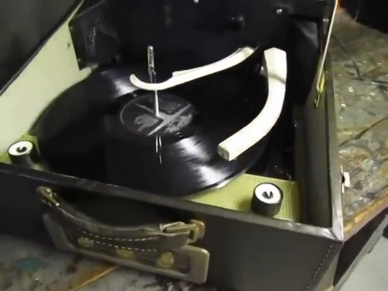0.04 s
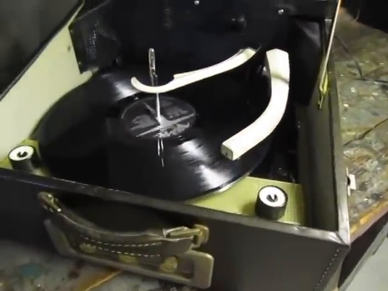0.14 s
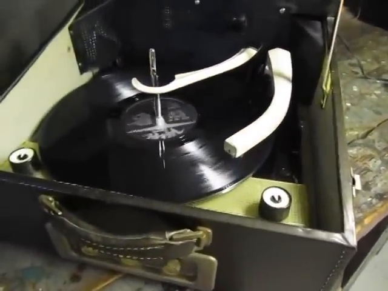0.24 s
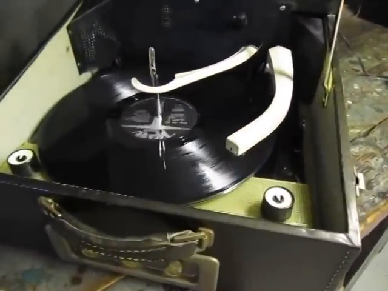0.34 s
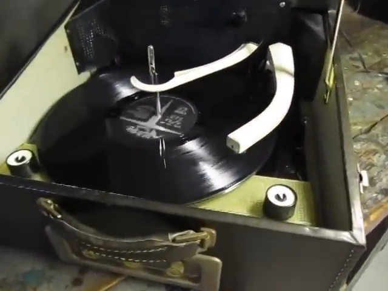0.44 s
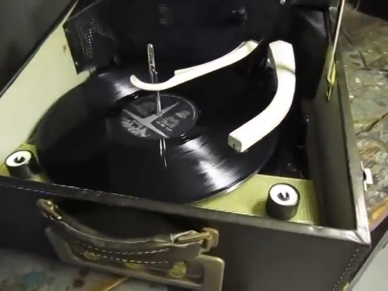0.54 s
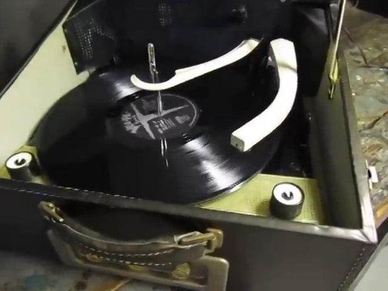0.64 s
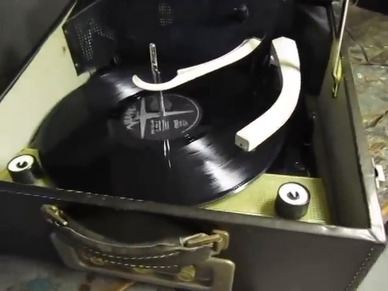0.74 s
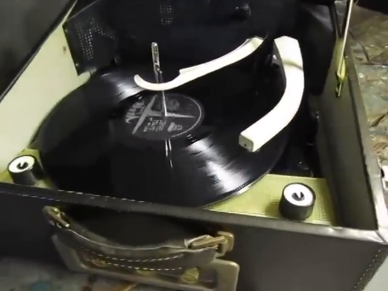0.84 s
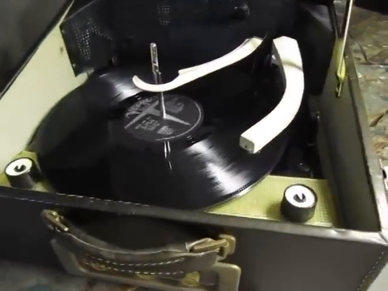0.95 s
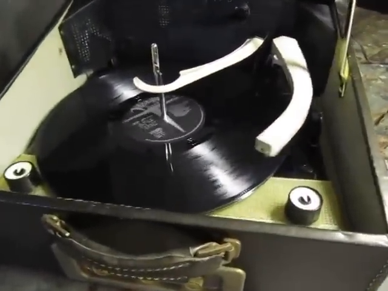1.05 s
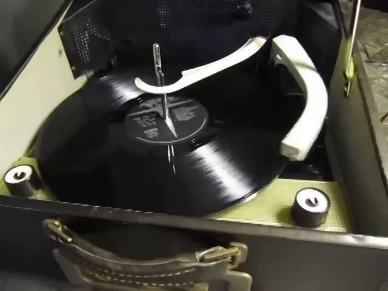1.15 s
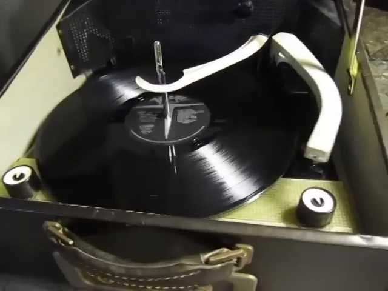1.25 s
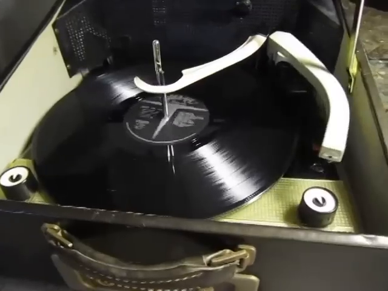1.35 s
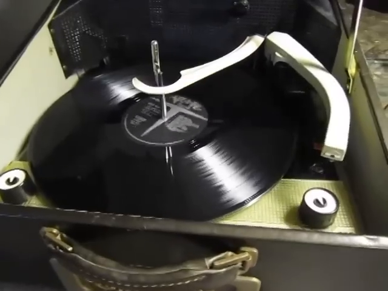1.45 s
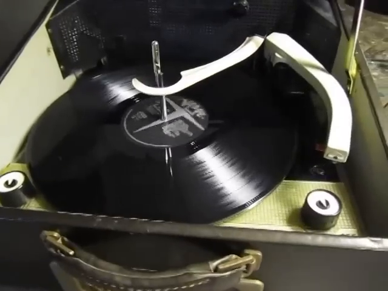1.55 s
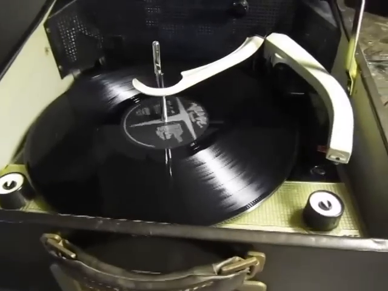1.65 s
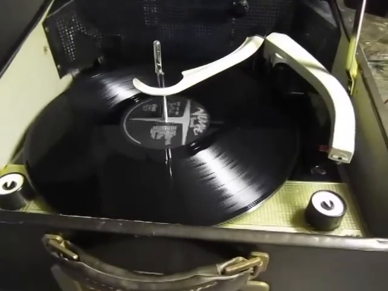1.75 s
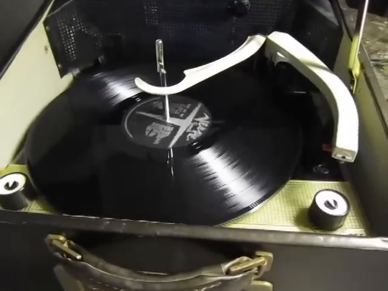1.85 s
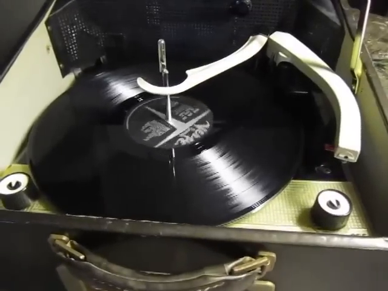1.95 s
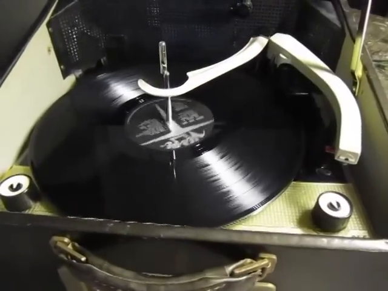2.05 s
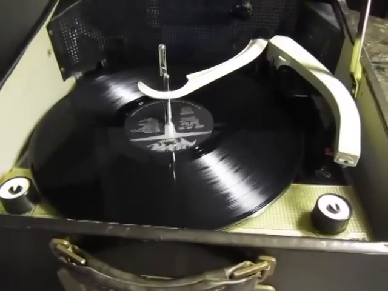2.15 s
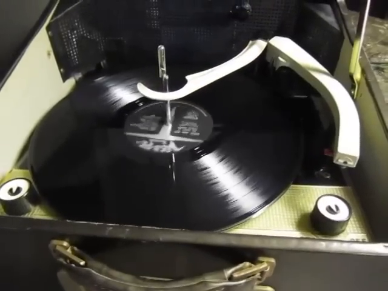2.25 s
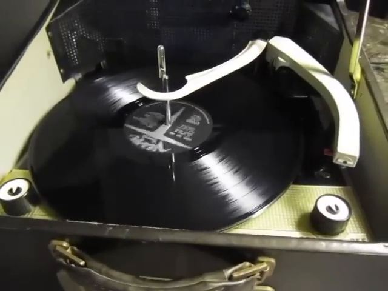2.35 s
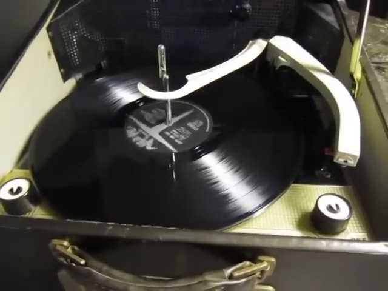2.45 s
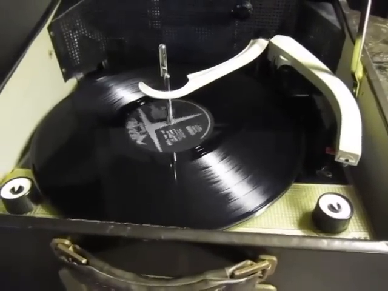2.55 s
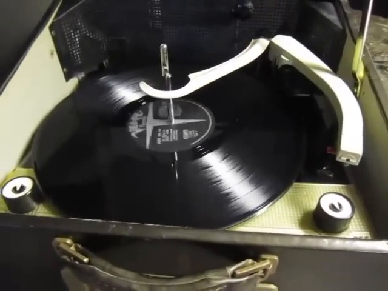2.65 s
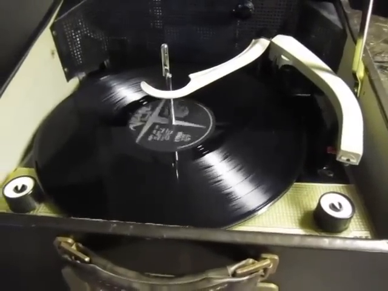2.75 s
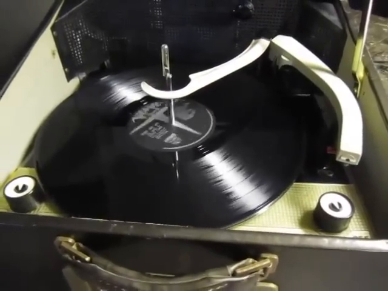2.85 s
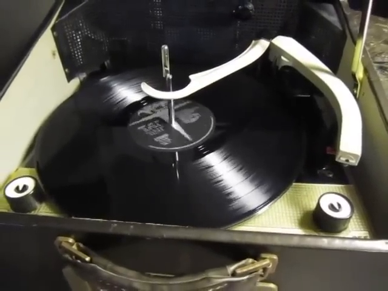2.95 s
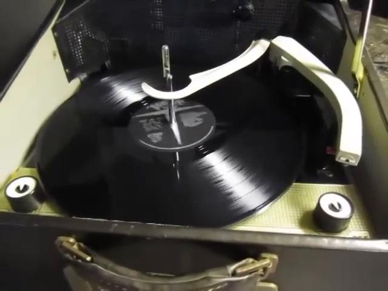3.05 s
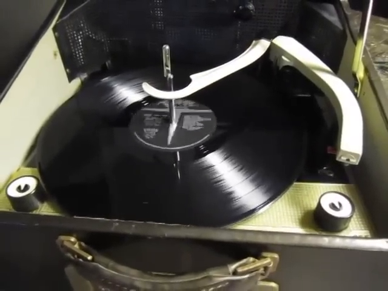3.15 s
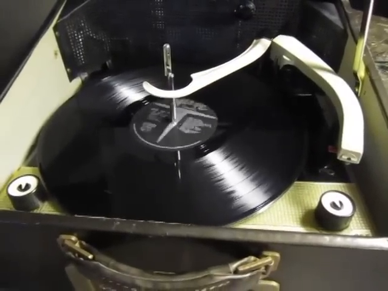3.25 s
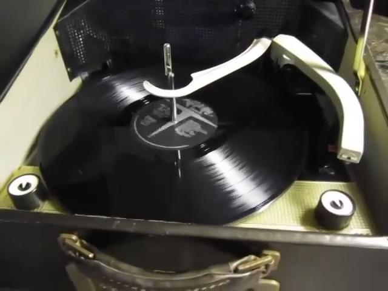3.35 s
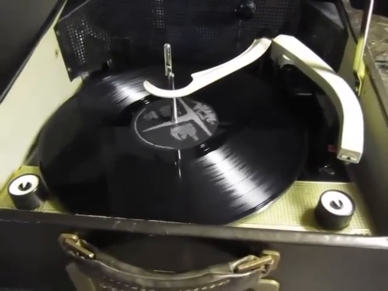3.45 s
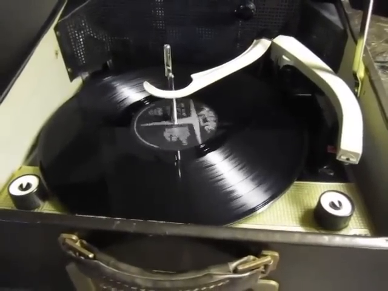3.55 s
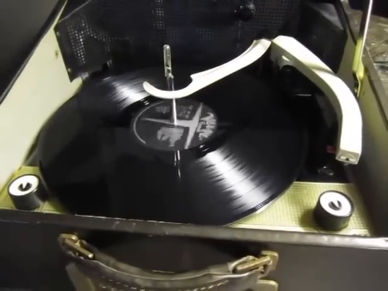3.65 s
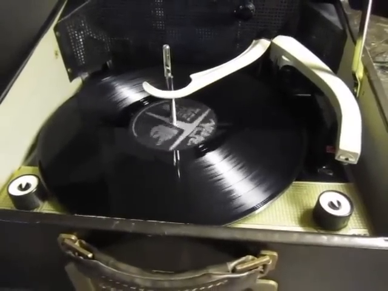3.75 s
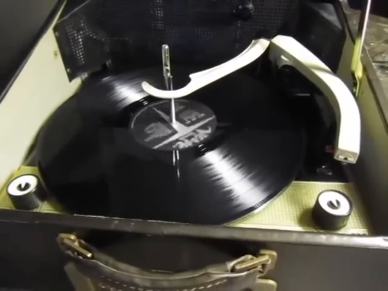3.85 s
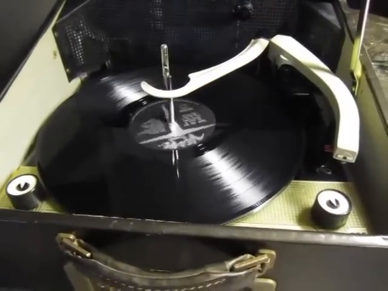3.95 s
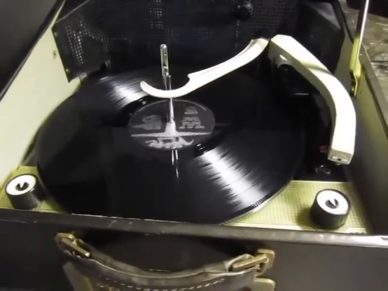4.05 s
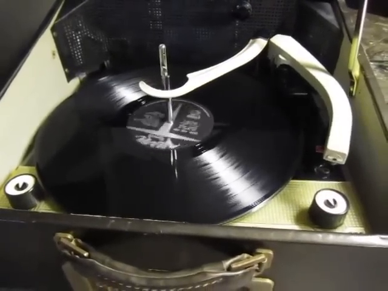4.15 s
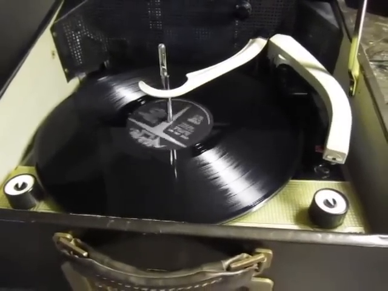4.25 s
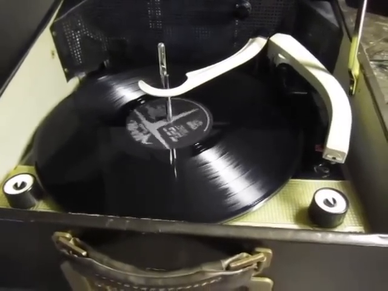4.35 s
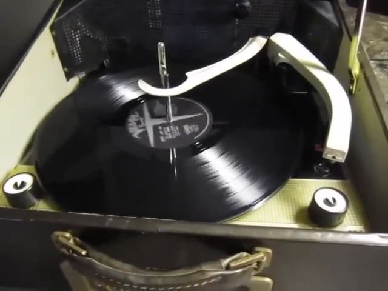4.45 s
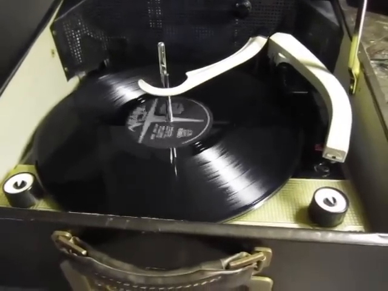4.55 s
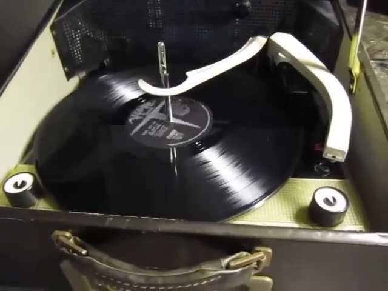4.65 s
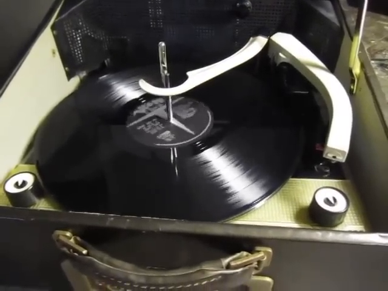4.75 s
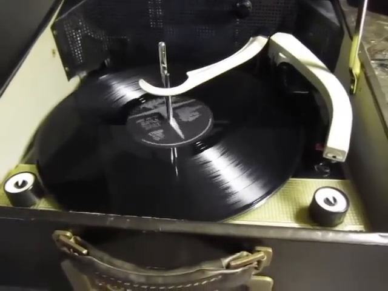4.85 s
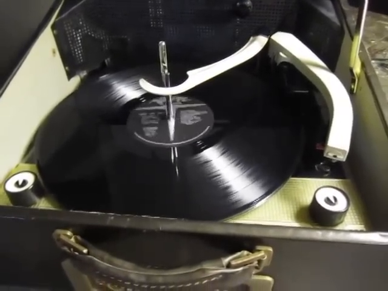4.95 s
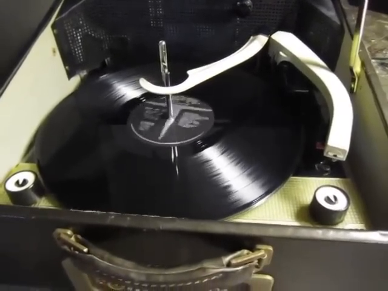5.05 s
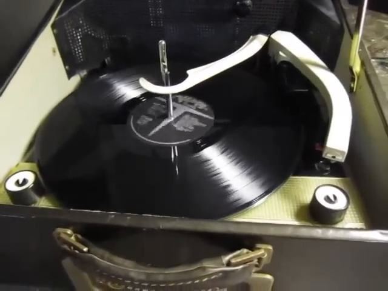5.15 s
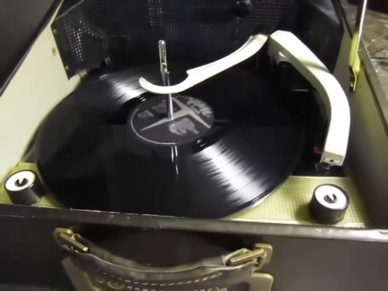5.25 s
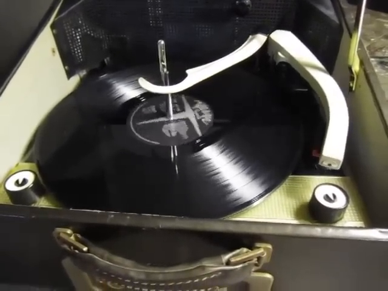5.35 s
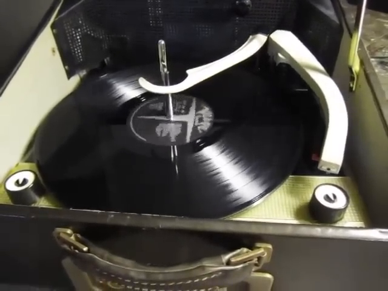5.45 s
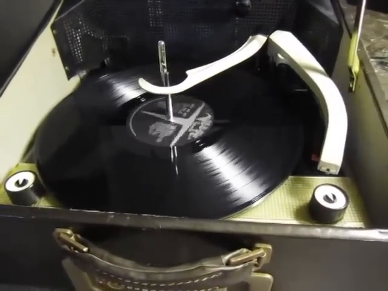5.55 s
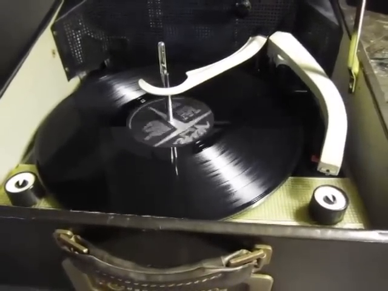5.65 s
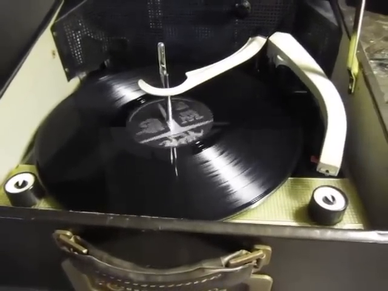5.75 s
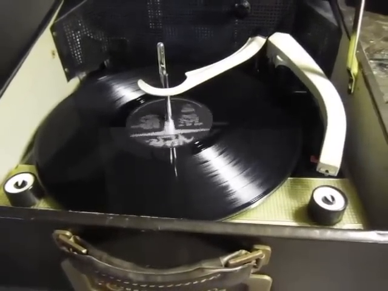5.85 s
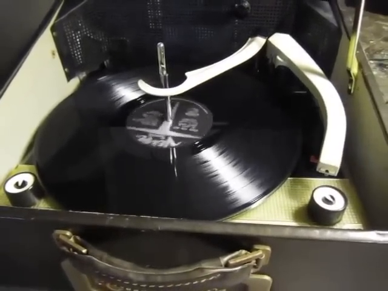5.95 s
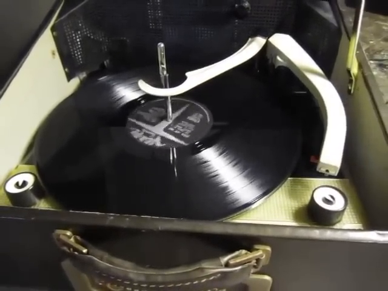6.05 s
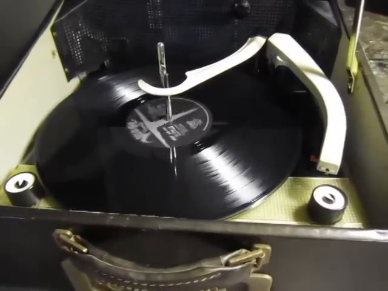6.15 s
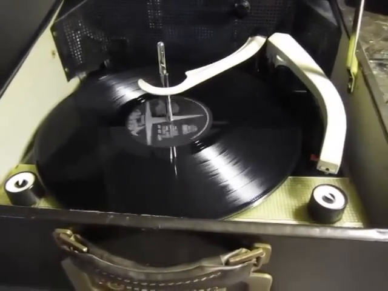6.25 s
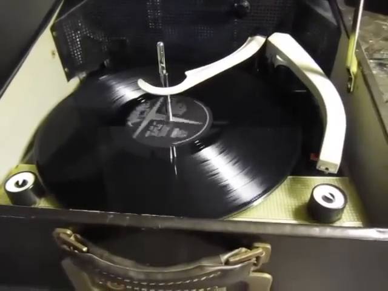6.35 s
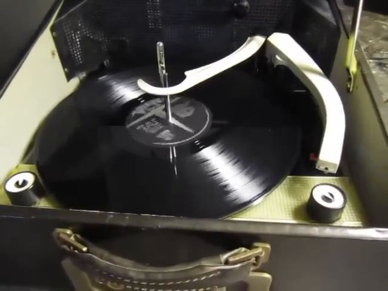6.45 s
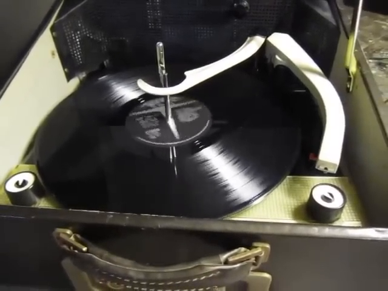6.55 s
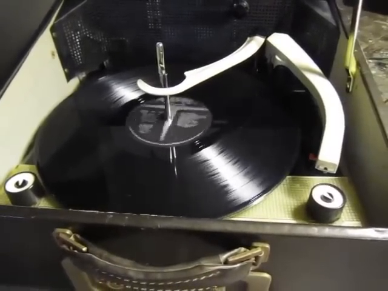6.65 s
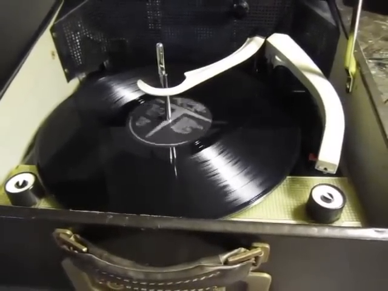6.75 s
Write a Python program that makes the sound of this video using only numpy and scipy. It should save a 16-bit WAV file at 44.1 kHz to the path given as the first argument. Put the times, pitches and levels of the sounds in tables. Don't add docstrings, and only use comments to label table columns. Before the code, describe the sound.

Close indoor stereo pickup of an old automatic turntable: steady electrical hum and mechanical rumble, light knocks and singing spring as the arm returns, then a quieter stretch with isolated ticks. Cams scrape and slam, several clunks follow, and a sharp double-edged switch snap kills the hum. The background ducks suddenly, thin spring tones linger with a faint room echo, and a loose lever clatters to rest as hiss creeps back.

```python
import sys
import numpy as np
from scipy import signal
from scipy.fft import rfft, irfft, next_fast_len
from scipy.io import wavfile
from scipy.ndimage import uniform_filter1d, map_coordinates

SR = 44100
rng = np.random.default_rng(int(sys.argv[2]) if len(sys.argv) > 2 else 0)


def convert_level_to_amplitude(level_db):
    exponent = np.asarray(level_db, float) / 20
    return 10 ** exponent


def to_wav(s):
    ch = np.atleast_2d(s).T
    pcm = np.round(np.clip(ch, -1, 1) * 32767)
    wavfile.write(sys.argv[1], SR, pcm.astype(np.int16))


N = 300214
MAINS_HZ = 59.99
SWITCH_S = 5.986
LEAD, SPAN = 1024, 8192
AGE = (np.arange(SPAN) - LEAD) / SR


def unit(x):
    return x / np.sqrt(np.mean(x ** 2) + 1e-20)


def along(points, hz):
    f, v = np.transpose(points)
    return np.interp(np.log(hz + 1), np.log(f + 1), v)


def wobble(rate):
    coarse = np.arange(0, N + 64, 64)
    knots = rng.standard_normal(int(N * rate / SR) + 4)
    return np.interp(np.arange(N), coarse, map_coordinates(knots, [coarse * rate / SR]))


def coloured(x, response):
    m = next_fast_len(len(x) + 4096)
    return irfft(rfft(x, m) * response(np.fft.rfftfreq(m, 1 / SR)), m)[:len(x)]


def noise(gain, size=N):
    return unit(coloured(rng.standard_normal(size), gain))


def bump(hz, centre_hz, width_hz):
    return 1j * hz * width_hz / (centre_hz ** 2 - hz ** 2 + 1j * hz * width_hz)


def step(at_s, length_s):
    return .5 + .5 * np.tanh((np.arange(N) / SR - at_s) / length_s)


def since(at_s):
    return np.maximum(np.arange(N) / SR - at_s, 0)


def blow(t60, rise):
    hold_s = 0.0018
    swell = np.clip(1 + AGE / rise, 0, 1) ** 2
    after = np.maximum(AGE, 0)
    return swell * convert_level_to_amplitude(-60 * after ** 2 / (after + hold_s) / t60)


def add(track, s, db, sound):
    track[round(s * SR):][:SPAN] += convert_level_to_amplitude(db) * sound / np.abs(sound).max()


def ring(modes):
    t = np.arange(SR // 2) / SR
    loose = lambda: map_coordinates(rng.standard_normal(40), [t * 60])
    total = 0
    for hz, db, t60, uneven_db in modes:
        strength = convert_level_to_amplitude(db + uneven_db * loose() - 60 * t / t60)
        total = total + strength * np.sin(2 * np.pi * hz * t + uneven_db / 6 * loose())
    return np.minimum(t / 0.0062, 1) * np.cos(np.pi * t) * total


# pitch_hz [Hz], level_db [dB per Hz]
WORKS = [(24, -35), (40, -15.5), (98, -10), (174, 0.5), (429, -5), (593, -7.5), (655, -9), (977, -10.5),
         (1320, -14.5), (3320, -18.5), (3950, -27.5), (4480, -23), (7020, -25), (11000, -40),
         (13600, -51.5), (15600, -70.5)]


def works_colour(hz):
    return convert_level_to_amplitude(along(WORKS, hz))


# harmonic [multiple of mains], level_db [dB peak]
HUM = [(1, -65), (2, -65.5), (3, -58.5), (4, -66.5), (5, -65.5), (6, -70.5), (8, -83.5), (9, -64.5),
       (12, -71), (14, -74), (15, -76.5)]
# pitch_hz [Hz], width_hz [Hz], level_db [dB]
WHIRR = [(3212, 110, -77), (4415, 99, -84.5), (5210, 190, -83), (6060, 110, -86), (7150, 61, -86.5)]


def motor():
    turn = 2 * np.pi * MAINS_HZ * np.arange(N) / SR
    hum = 0
    for k, db in HUM:
        phase = .08 * wobble(4) + rng.uniform(0, 2 * np.pi)
        hum = hum + convert_level_to_amplitude(db + 1.0 + 2.1 * wobble(5.3)) * np.sin(k * turn + phase)
    works = convert_level_to_amplitude(-56 + 0.98 * wobble(2.6) + 0.72 * wobble(25)) * noise(works_colour)
    rumble = coloured(works, lambda f: 1 / (1 + (f / 170) ** 4))
    whirr = sum(convert_level_to_amplitude(db) * noise(lambda f: bump(f, hz, width) ** 2) for hz, width, db in WHIRR)
    whine_db = -67.5 - 12.5 * step(.99, .03) + 0.814 * wobble(5.8)
    whine = convert_level_to_amplitude(whine_db) * noise(lambda f: bump(f, 3400, 150.8) ** 2)
    off = step(SWITCH_S + .05, .025)
    return convert_level_to_amplitude(-23.5 * off) * (hum + whirr) + convert_level_to_amplitude(-4.5 * off) * rumble + convert_level_to_amplitude(-3.5 * off) * (works - rumble) + whine


def buzz():
    strain = np.exp(-((np.arange(N) / SR - 1.1) / 0.44) ** 2)
    level_db = -62 + 2 * strain - 12.5 * since(SWITCH_S)
    phase = 2 * np.pi * 10 * MAINS_HZ * np.arange(N) / SR
    return convert_level_to_amplitude(level_db + .8 * wobble(9.7)) * np.sin(phase + .1 * wobble(4))


def room_tone():
    return convert_level_to_amplitude(-59) * noise(lambda f: works_colour(f) * bump(f, 1210, 3000) ** 2 * (f > 130))


# pitch_hz [Hz], level_db [dB per Hz]
HISS = [(15, -51.5), (25, -28.5), (160, -0.5), (247, -4.5), (290, -3), (568, -10.5), (1460, -21.5),
        (2710, -28), (3950, -38), (5030, -35.5), (6590, -36), (10100, -48), (15600, -70.5)]


def microphone_hiss():
    return convert_level_to_amplitude(-47.5) * noise(lambda f: convert_level_to_amplitude(along(HISS, f)))


def camera_gain():
    climb_db = -4.5 + 6 * step(.95, .39)
    return convert_level_to_amplitude(climb_db - 10.5 * step(SWITCH_S + .02, .02) + 5.5 * since(SWITCH_S))


# start_s [s], level_db [peak dB], pitch_hz [Hz], t60_s [s]
THUDS = [(.427, -45.5, 180, 0.06), (1.028, -33, 268.4, 0.19), (1.213, -28.5, 285, 0.14),
         (1.222, -38, 110, 0.11), (1.231, -28, 200, 0.103), (1.249, -28, 229, .076),
         (1.268, -33.5, 223.5, 0.069), (1.311, -40.5, 281, 0.19), (1.725, -45, 400, .06),
         (1.446, -37.5, 268, 0.11), (1.439, -42.5, 151, 0.12), (2.87, -44.5, 188.6, 0.4),
         (3.332, -43.5, 242, .11), (4.097, -37.5, 156, .09), (4.129, -39, 376, 0.062),
         (4.146, -35.5, 225, 0.13), (4.165, -39.5, 133, .084), (4.437, -25.5, 456, 0.025),
         (4.442, -32, 248, 0.085), (5.146, -31, 232, 0.07), (5.335, -43.5, 263, .1),
         (5.984, -26.5, 250.6, 0.14), (5.986, -49, 60, .09), (6.677, -44, 280.5, .22)]


def thuds():
    out = np.zeros(N + SPAN)
    for s, db, hz, t60 in THUDS:
        grit = 0.39 * noise(lambda f: bump(f, hz, 0.81 * hz) ** 2, size=SPAN)
        add(out, s, db, blow(t60, .003) * (np.sin(2 * np.pi * hz * AGE) + grit))
    return out[LEAD:][:N]


# pitch_hz [Hz], level_db [dB]
TREBLE = [(3500, 6), (4000, -4), (5500, -1.5), (9000, -5.5), (12000, -13.5), (13500, -19), (14500, -28),
          (15500, -40)]


def treble(hz):
    return convert_level_to_amplitude(along(TREBLE, hz))


# start_s [s], level_db [peak dB], pitch_hz [Hz], t60_s [s]
PIPS = [
    (0.434, -55, 810, 0.042),
    (1.11, -39.5, 940, 0.023),
    (1.165, -40.5, 732, 0.037),
    (2.105, -49, 969, 0.054),
    (3.846, -33.5, 982, 0.027),
    (4.371, -37, 920, 0.024),
    (5.061, -45, 715, 0.035),
    (5.511, -40.5, 2520, 0.035),
    (5.683, -44, 965, 0.043),
]
# start_s [s], level_db [peak dB],
# pitch_hz [Hz], t60_s [s]
PART_NOTES = [(4.4435, -15.5, 957, 0.022), (4.4472, -16.5, 1010, .018), (5.9848, -10, 2380, 0.025),
              (5.9858, -9.5, 3150, 0.022), (5.986, -23, 750, .05), (5.985, -36, 14500, .03),
              (5.9848, -13, 6070, 0.033), (5.984, -20.5, 960, 0.041), (5.9875, -15.5, 2500, .015),
              (5.9915, -18, 5400, .04), (6.0045, -24.5, 5114, .06), (6.006, -28, 6070, .04),
              (6.029, -33, 7500, .04), (6.5835, -27, 1700, 0.026), (6.582, -30.5, 2900, .03),
              (6.541, -31, 3200, .04), (6.541, -34, 1380, .04), (4.431, -23.5, 6300, .04),
              (4.444, -25, 3000, .03), (4.434, -29, 2600, 0.045), (4.431, -24.5, 7100, .04),
              (4.436, -24.5, 7500, .04), (4.433, -27, 4800, .04),
              (1.219, -38, 9000, .015), (1.224, -34, 5620, .03), (1.265, -38, 1890, .05),
         (1.309, -35, 7500, .04), (1.31, -41, 1900, .06), (1.309, -47, 11470, 0.069), (1.31, -53, 9220, .1),
         (1.632, -45, 2500, .04), (1.657, -46, 2680, .04), (1.726, -35.5, 1620, 0.069),
         (1.726, -37.5, 2820, .05), (1.742, -51, 6400, .15), (1.931, -41, 2450, 0.034),
         (2.865, -50, 10100, .025), (2.865, -48, 4740, .03), (2.869, -40, 1010, .05),
         (2.871, -44.5, 1600, .08), (4.945, -41, 2470, .06), (4.947, -43, 1880, .06),
         (4.947, -44.5, 4550, 0.087), (5.149, -32.5, 1910, .04), (5.148, -37, 620, .05),
         (1.312, -41, 520, .08), (5.34, -29.5, 1893, 0.053), (5.337, -32, 1020, 0.046),
         (5.338, -35, 2510, 0.036), (5.343, -36.5, 721, .05), (5.78, -30, 942, 0.063),
         (5.784, -27.5, 1676, 0.05), (5.798, -38, 1600, 0.055), (5.812, -44, 1700, 0.053),
         (6.69, -44, 1000, .03), (6.6, -41.5, 1850, .3), (6.61, -49, 2900, .3), (6.568, -42, 1850, .08),
         (1.224, -38, 6600, .04), (1.222, -33, 2390, 0.036), (1.93, -50, 4970, .04)]


def part_tones():
    out = np.zeros(N + SPAN)
    for s, db, hz, t60 in PIPS + PART_NOTES:
        grit = .45 * noise(lambda f: bump(f, hz, hz) ** 4 * treble(f), size=SPAN)
        add(out, s, db, blow(t60, .003) * (np.sin(2 * np.pi * hz * AGE) + grit))
    return out[LEAD:][:N]


# pitch_hz [Hz], level_db [dB per Hz]
CLACK = [(180, -52), (300, -14.5), (477, -8.5), (942, 2.5), (2080, -2), (2390, 2.5), (3170, -5),
         (3510, -8.5), (4500, -34), (5850, -48.5), (9900, -120)]
# pitch_hz [Hz], width_hz [Hz], level_db [dB]
CHASSIS = [(715, 170, 8.5), (1010, 39, 5), (1460, 98, 6), (1880, 71, 9), (2540, 120, -4.5),
           (3150, 670, 0.5)]


def chassis(hz):
    return convert_level_to_amplitude(along(CLACK, hz)) * (1 + sum(convert_level_to_amplitude(db) * abs(bump(hz, c, w)) ** 2 for c, w, db in CHASSIS))


# start_s [s], level_db [peak dB], pitch_hz [Hz], clack_db [dB], tick_db [peak dB]
SWING = [(1.002, -41.5, 1510, 8, -58), (1.024, -38.5, 1430, 18, -70), (1.213, -25.5, 1490, 4, -37),
         (1.2185, -23.5, 610, -5, -32), (1.223, -23, 1416, -3, -28), (1.262, -31.5, 1490, 3, -41),
         (1.308, -30.5, 1460, 15, -28.5), (1.392, -39.5, 1460, 18, -53), (1.436, -37, 1460, 1, -43),
         (1.452, -33, 1500, -1, -39.5), (1.621, -43, 1830, 0, -50), (1.63, -39, 1830, -1, -46),
         (1.654, -41, 2600, -1, -41.5), (1.724, -29, 2650, 3, -26), (1.93, -42, 2440, -4, -53)]
# start_s [s], level_db [peak dB], pitch_hz [Hz], clack_db [dB],
# tick_db [peak dB]
CYCLE = [(2.454, -45, 1200, 1, -70), (2.508, -45.5, 826, -3, -56), (2.868, -37, 1010, 5, -44),
         (3.328, -35.5, 875, -3, -54), (3.812, -42, 1000, 1, -70), (3.847, -39, 1900, 0, -60),
         (4.16, -36, 1400, 0, -58), (4.173, -37, 750, 2, -62), (4.4315, -19, 910, 8, -17.5),
         (4.459, -24, 1530, 3, -24), (4.77, -41.5, 853, 1, -70), (4.836, -40.5, 894, -2, -70),
         (4.943, -35, 1900, 3, -38), (5.148, -29, 1580, -7, -41), (5.337, -28.5, 1010, 1, -47.5),
         (5.629, -47, 1520, 7, -70), (5.78, -25.5, 1620, 5, -50), (5.824, -38.5, 870, 6.5, -50.5)]
# start_s [s], level_db [peak dB], pitch_hz [Hz],
# clack_db [dB], tick_db [peak dB]
SETTLE = [
    (6.5395, -26, 2410, 3, -31),
    (6.544, -31, 2500, 6, -39),
    (6.57, -31, 2800, 3, -36.5),
    (6.58, -25, 1380, 2, -42),
    (6.5835, -28.5, 2500, 2, -41),
    (6.592, -36.5, 1000, 3, -55),
    (6.601, -34.5, 2380, 9, -48),
    (6.631, -40, 990, 8.5, -52),
    (6.676, -39, 1505, 4, -47.5),
    (6.68, -34, 770, -4.5, -50.5),
]
# start_s [s], level_db [peak dB], pitch_hz [Hz], clack_db [dB], t60_s [s]
SLAMS = [
    (4.4425, -16, 950, 3.5, .03),
    (4.4468, -20.5, 1000, 9, .026),
    (4.452, -22, 680, 5, .05),
    (5.9827, -10, 3100, 5.5, .035),
    (5.9852, -8.5, 2380, -1, .022),
    (5.9868, -12.5, 2800, 3, .018),
    (5.9902, -12.5, 1900, 2, .04),
    (5.9958, -20, 2450, 3.5, .055),
    (6.003, -26, 1030, 2, .08),
]


def contacts():
    out = np.zeros(N + SPAN)
    blows = [(*row, .002) for row in SLAMS]
    for rows, t60 in [(SWING, .081), (CYCLE, .072), (SETTLE, .06)]:
        blows += [(*row[:4], t60, .0025) for row in rows]
    for s, db, hz, clack_db, t60, rise in blows:
        tone = noise(lambda f: bump(f, hz, 0.41 * hz) ** 2 / (1 + (f / 7000) ** 4), size=SPAN)
        clack = noise(chassis, size=SPAN)
        add(out, s, db, blow(t60, rise) * (tone + convert_level_to_amplitude(clack_db) * clack))
    return out[LEAD:][:N]


# pitch_hz [Hz], width_hz [Hz], level_db [dB]
STEEL = [(4750, 150, 1.5), (5040, 49, 0.5), (5550, 99, 0.5), (6400, 91, 5), (7530, 120, 3), (8280, 130, 0)]


def steel(hz):
    return 1 + sum(convert_level_to_amplitude(db) * abs(bump(hz, c, w)) ** 2 for c, w, db in STEEL)


# start_s [s], level_db [peak dB], pitch_hz [Hz]
TICKS = [(1.1742, -50, 6170), (2.5745, -54, 5070), (2.5975, -48, 5230), (4.121, -48.5, 5710),
         (4.426, -40, 7020), (4.4364, -18.5, 7060), (4.4425, -21, 5500), (4.448, -27, 6500),
         (4.6688, -49, 5170), (4.7835, -46.5, 7100), (4.8733, -49.5, 6420), (4.9375, -36.5, 4400),
         (5.311, -57, 6500), (5.5104, -49, 4600), (5.983, -13, 7000), (5.9853, -15, 8500),
         (5.9904, -18.5, 5390), (6.0034, -24, 5120), (6.0075, -27, 7000), (6.04, -32, 8000),
         (6.029, -25, 6430), (6.5231, -61, 5670)]
# start_s [s], level_db [peak dB]
SPARKS = [(1.2226, -36), (1.308, -30), (1.4476, -44.5), (1.725, -34), (2.794, -55), (2.865, -54),
          (4.4305, -19), (4.436, -25), (4.459, -31), (4.942, -42), (5.147, -47), (5.9844, -11.5),
          (6.029, -40), (6.538, -40)]


def ticks():
    out = np.zeros(N + SPAN)
    edges = [(s - .0002, db, 5830) for s, *_, db in SWING + CYCLE + SETTLE]
    strikes = [(*row, .043, .08) for row in edges + TICKS]
    strikes += [(s, db, 9700, .038, .31) for s, db in SPARKS]
    for s, db, hz, t60, skirt in strikes:
        peak = lambda f: skirt + abs(bump(f, hz, 0.65 * hz)) ** 2
        tick = noise(lambda f: treble(f) * (f > 3500) * steel(f) * peak(f), size=SPAN)
        add(out, s, db, blow(t60, .59 * .0016) * tick)
    return out[LEAD:][:N]


# start_s [s], level_db [peak dB]
JOLTS = [(1.0027, -44.5), (1.0233, -56), (1.0999, -54), (1.2187, -31.5), (1.262, -37), (1.3094, -44),
         (1.3444, -47), (1.391, -48.5), (1.4485, -42), (1.507, -54), (1.5464, -52.5), (2.873, -52),
         (5.146, -40), (5.2011, -55), (5.234, -49.5), (5.391, -53), (5.4345, -55), (5.6151, -53),
         (5.6994, -56), (5.8656, -53)]
# pitch_hz [Hz], level_db [dB], t60_s [s], uneven_db [dB]
SPRING = [(1457, -1, .12, 3), (1522, -4, .11, 3), (1625, -8, .09, 2), (1890, -8, .1, 2)]


def arm_spring():
    out = np.zeros(N + SR)
    for s, db in JOLTS:
        out[round(s * SR):][:SR // 2] += convert_level_to_amplitude(db + 4.0) * ring(SPRING)
    return out[:N]


# start_s [s], level_db [peak dB]
SCUFFS = [
    (1.177, -41.5),
    (3.854, -44),
    (4.05, -37.5),
    (4.098, -33),
    (4.127, -36),
    (4.141, -36.5),
    (4.159, -28),
    (4.166, -32.5),
    (4.179, -36),
    (5.683, -39.5),
]
# pitch_hz [Hz], level_db [dB]
SCUFF = [(100, -12.5), (250, 2.5), (600, 6), (1500, -1.5), (2500, -10.5), (3500, -25), (6000, -53)]


def scuffs():
    out = np.zeros(N + SPAN)
    for s, db in SCUFFS:
        add(out, s, db, blow(.073, .0077) * noise(lambda f: convert_level_to_amplitude(along(SCUFF, f)), size=SPAN))
    return out[LEAD:][:N]


# start_s [s], pitch_hz [Hz]
SQUEAK = [
    (1.33, 11400),
    (1.36, 11150),
    (1.4, 11200),
    (1.44, 10800),
    (1.47, 10600),
    (1.52, 10480),
    (1.7, 10350),
]


def squeak():
    hz = np.interp(np.arange(N) / SR, *np.transpose(SQUEAK))
    swell = np.sin(np.pi * np.clip(since(1.31) / .39, 0, 1)) ** .3
    return swell * convert_level_to_amplitude(-78 + 4 * wobble(29.5)) * np.sin(2 * np.pi * np.cumsum(hz) / SR)


# pitch_hz [Hz], level_db [dB], t60_s [s], uneven_db [dB]
PLATE = [(96, -14.5, 0.41, 2.5), (460, -16, 0.87, 3), (700, -16.5, 1.1, 5), (1000, -13.5, 0.47, 8),
         (1830, -12.5, 0.36, 4.5), (2390, -13, .3, 3.5), (3090, -21, .9, 1), (3080, -10, 0.22, 3),
         (2860, -25, 1.4, 1.5), (3290, -26.5, 1.6, 3), (3400, -27.5, 1.6, 3), (5120, -15.5, 0.32, -1),
         (9170, -45, 1.5, 5.5)]


def switch_plate():
    out = np.zeros(N + SR)
    out[round(SWITCH_S * SR):][:SR // 2] += convert_level_to_amplitude(-32) * ring(PLATE)
    return out[:N]


# pitch_hz [Hz], level_db [dB], t60_s [s]
COILS = [(700, -64, 2.2), (1010, -64.5, 2.1), (1125, -69, 1.2), (1954, -66, 1.5), (2401, -69, 3),
         (2842, -70.5, 3), (2961, -71, 3), (2993, -70, 3.1), (3068, -71.5, 3), (3200, -67, 2),
         (3240, -72.5, 3), (3397, -72.5, 3)]


def coils():
    t = since(SWITCH_S)[round(SWITCH_S * SR):]
    beat = lambda: map_coordinates(rng.standard_normal(24), [t * 14])
    lines = 0
    for hz, db, t60 in COILS:
        strength = convert_level_to_amplitude(db + 5.5 + 3 * beat() - 60 * t / t60)
        lines = lines + strength * np.sin(2 * np.pi * hz * t + 0.65 * beat())
    return np.pad(lines * np.minimum(t / .01, 1), (N - len(t), 0))


# pitch_hz [Hz], level_db [dB], t60_s [s], uneven_db [dB]
PING = [(11660, -35, .22, .2)]


def pin():
    start = round((SWITCH_S + .006) * SR)
    return np.pad(ring(PING), (start, N - start - SR // 2))


# pitch_hz [Hz], width_hz [Hz], level_db [dB]
CHIRP = [(9120, 120, -82), (10050, 150, -89), (7400, 200, -88)]
# start_s [s], length_s [s], level_db [dB]
CHIRPS = [
    (6.26, .045, 2),
    (6.4, .045, -2),
]


def chirps():
    t = np.arange(N) / SR
    swell = sum(convert_level_to_amplitude(db) * np.exp(-((t - s) / length) ** 2) for s, length, db in CHIRPS)
    bands = noise(lambda f: sum(convert_level_to_amplitude(db) * abs(bump(f, hz, w)) ** 2 for hz, w, db in CHIRP))
    return swell * convert_level_to_amplitude(CHIRP[0][2]) * bands


def room(x, decay, colour):
    hz, t, z = signal.stft(x, SR, nperseg=256)
    fed = uniform_filter1d(abs(z) ** 2, size=5, axis=0) * convert_level_to_amplitude(2 * along(colour, hz))[:, None]
    keep = convert_level_to_amplitude(-120 * t[1] / along(decay, hz))
    return np.array([signal.lfilter([0, 0, 1 - k], [1, -k], row) for k, row in zip(keep, fed)])


# pitch_hz [Hz], t60_s [s]
ROOM = [(200, 0.91), (1000, 0.48), (3000, 0.3), (6000, 0.29), (12000, 0.13)]
# pitch_hz [Hz], t60_s [s]
HALL = [(200, 2.3), (1000, 0.96), (2500, 1.4), (3550, 1.5), (3900, 1), (12000, .8)]
# pitch_hz [Hz], level_db [dB]
LATE = [(250, -12), (700, 3), (2000, -1), (3000, -2.5), (3550, -5.5), (3850, -3.5), (4600, -2), (6000, -5),
        (12000, -6.5)]


def reverberant_power(hits):
    return room(hits, ROOM, [(1000, -14)]) + convert_level_to_amplitude(-47.5) * room(hits, HALL, LATE)


def diffuse(power):
    z = signal.stft(rng.standard_normal(N), SR, nperseg=256)[2]
    z = z / np.sqrt(np.mean(abs(z) ** 2)) * np.sqrt(abs(power))
    air = signal.istft(z, SR, nperseg=256)[1][:N]
    return coloured(air, lambda f: 1 / (1 + (180 / (f + 1)) ** 4))


# pitch_hz [Hz], level_db [dB]
WIDTH = [(100, -15.5), (700, -24), (2400, -19.5), (4400, -13), (8000, -8.5), (15000, -0.5)]


def scene():
    hits = thuds() + part_tones() + contacts() + ticks() + arm_spring() + scuffs() + squeak() + switch_plate()
    held = reverberant_power(hits)
    gain = camera_gain()
    mid = hits + diffuse(held) + gain * (motor() + room_tone()) + buzz() + coils() + pin() + chirps()
    skew = coloured(hits, lambda f: convert_level_to_amplitude(along(WIDTH, f)) * np.exp(1.8j))
    spread = coloured(diffuse(held), lambda f: convert_level_to_amplitude(along(WIDTH, f) + 4.0))
    side = skew + spread + gain * microphone_hiss()
    return np.array([mid + side, mid - side]) * convert_level_to_amplitude([[-.2], [.2]])


def top_cut(x):
    return signal.sosfilt(signal.butter(12, 15760, fs=SR, output="sos"), x)


def record(dry):
    mix = np.array([coloured(port, lambda f: f < 15700) for port in dry])
    return top_cut(mix)


dry = scene()
out = record(dry)
to_wav(out)
```